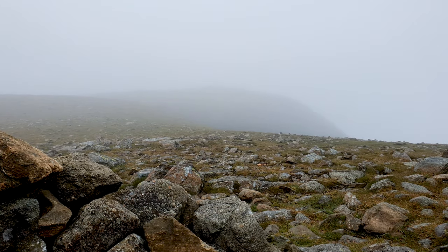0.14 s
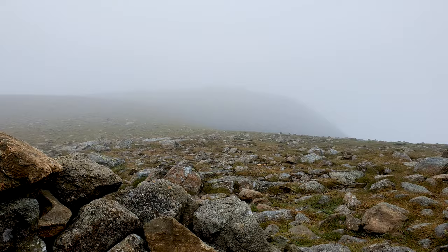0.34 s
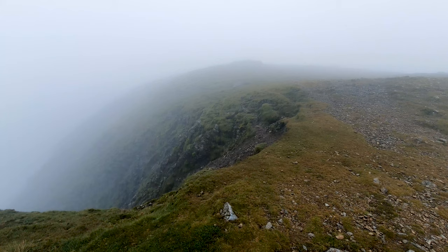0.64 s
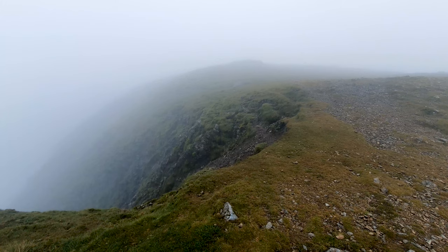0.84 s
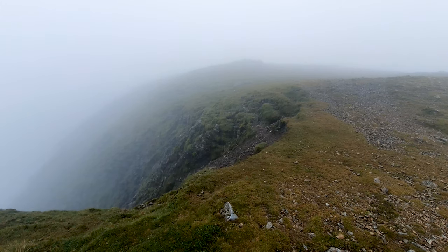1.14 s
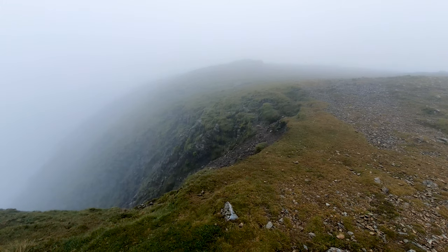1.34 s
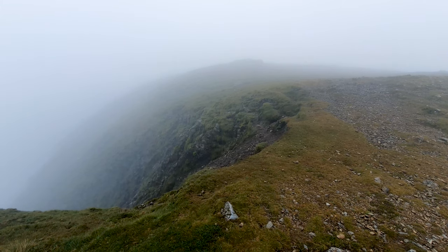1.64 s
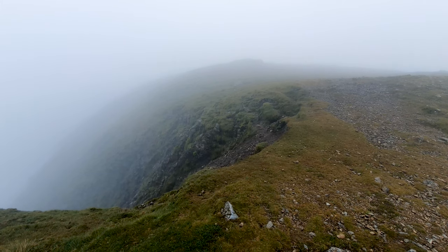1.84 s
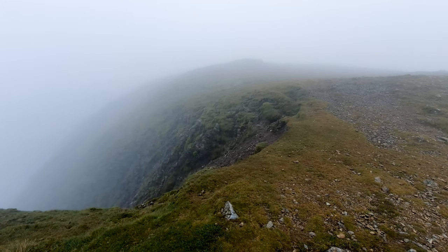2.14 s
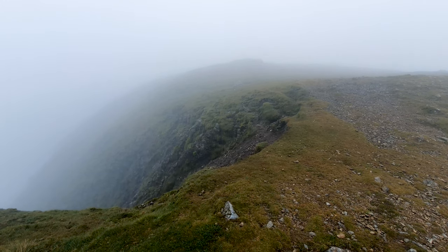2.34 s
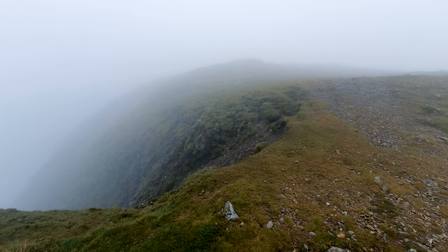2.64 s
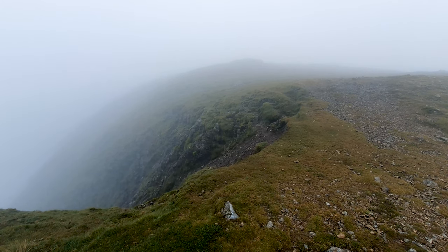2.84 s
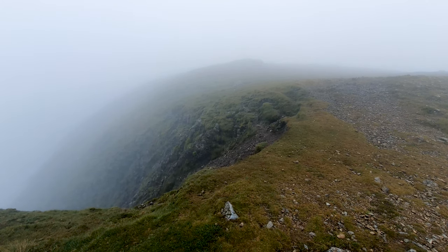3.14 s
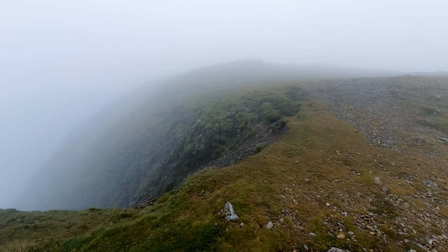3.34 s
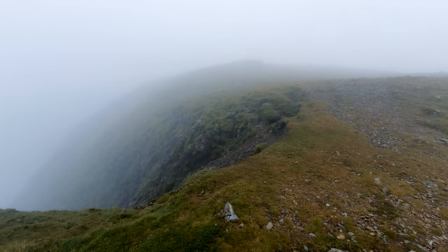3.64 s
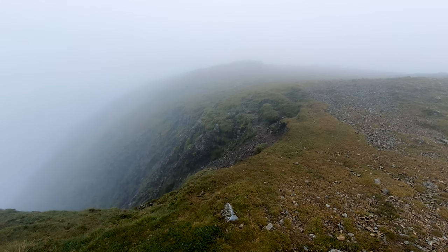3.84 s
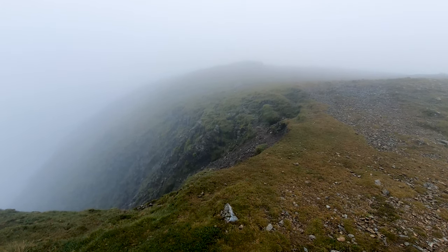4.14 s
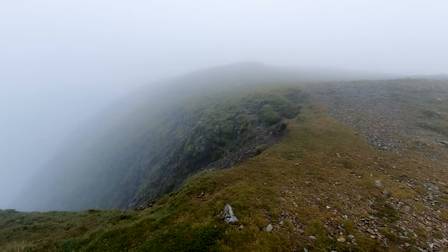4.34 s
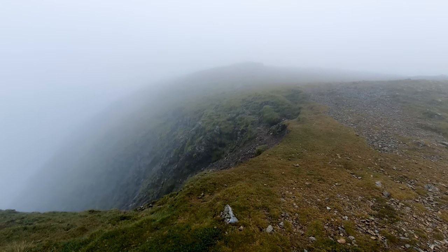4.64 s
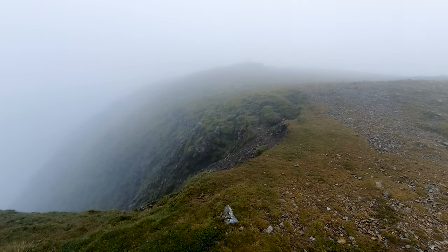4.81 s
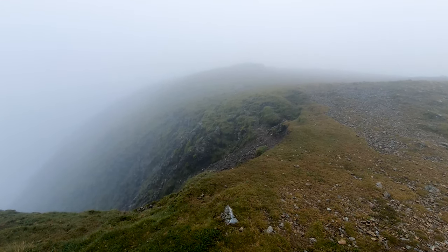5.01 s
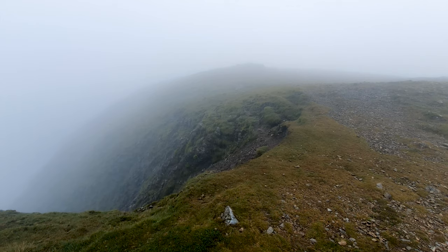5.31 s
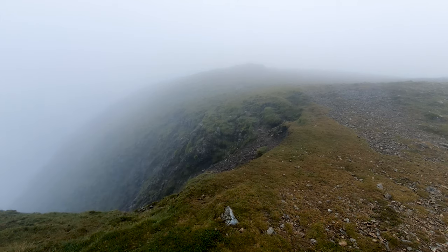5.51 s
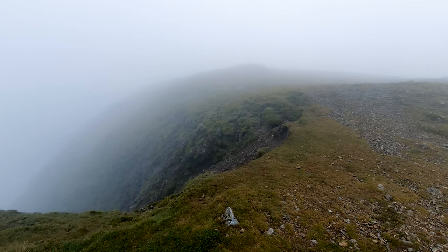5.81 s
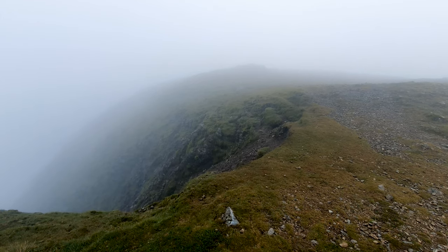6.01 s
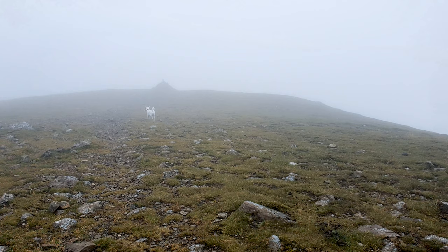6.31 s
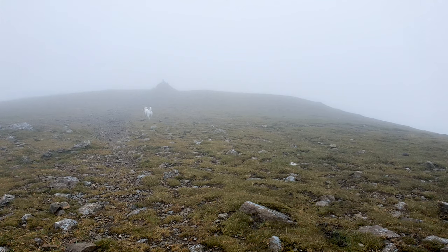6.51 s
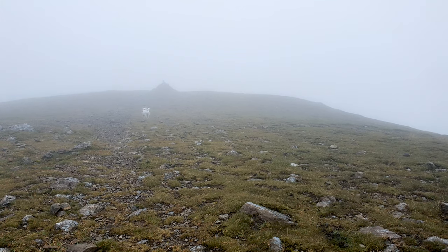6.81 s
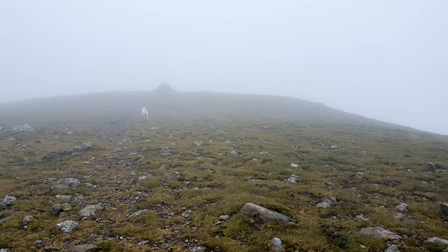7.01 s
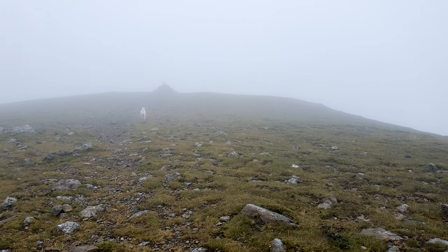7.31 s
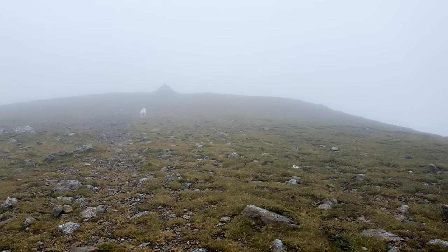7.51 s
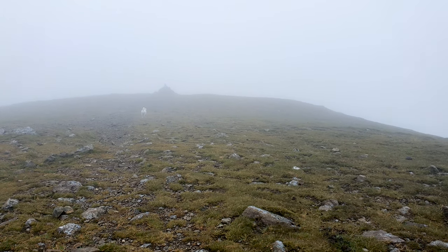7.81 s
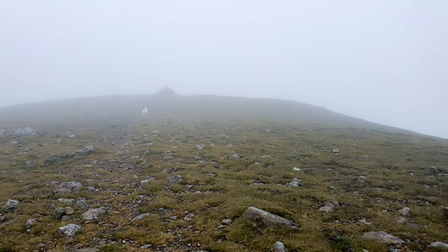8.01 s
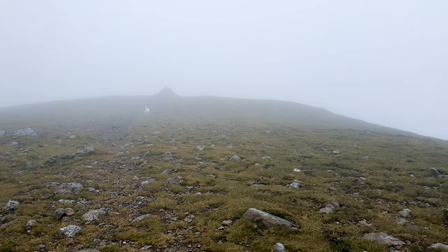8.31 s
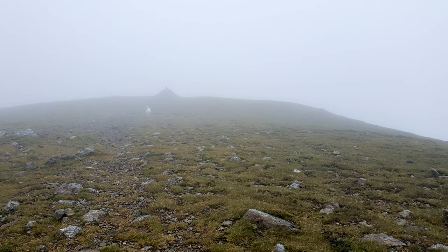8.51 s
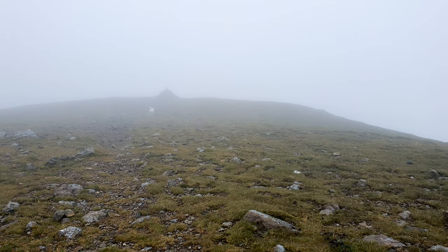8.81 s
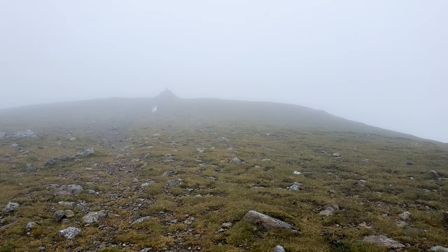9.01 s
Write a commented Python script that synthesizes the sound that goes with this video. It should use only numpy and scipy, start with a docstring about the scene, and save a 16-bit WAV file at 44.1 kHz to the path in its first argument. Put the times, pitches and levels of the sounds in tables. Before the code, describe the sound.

Uneven gusts of wind beat on a bare microphone outdoors, making a lumpy low rumble, a roar and short hissing puffs.

```python
"""A low rumble and a hiss, soon swelling into thumps: strong wind beats on a bare microphone.
It blows at three spots on a foggy mountain top: behind rocks, on a ridge, then on an open slope.
Big swirls of air shake the microphone's diaphragm, the thin skin that picks up sound (a lumpy rumble).
Small swirls rush past its opening (a roar, and a hiss that brightens with each gust)."""
import sys
import numpy as np
from scipy import signal
from scipy.fft import rfft, irfft
from scipy.io import wavfile
from scipy.ndimage import uniform_filter1d

SR = 44100
rng = np.random.default_rng(int(sys.argv[2]) if len(sys.argv) > 2 else 0)


def bounce(signal):
    """Save signal as a 16-bit WAV file at the path given by the first command-line argument."""
    frames = np.transpose(np.atleast_2d(signal))
    limited = np.clip(frames, -1, 1)
    pcm = np.round(limited * 32767).astype(np.int16)
    wavfile.write(sys.argv[1], SR, pcm)


N = 403515


def from_db(db):
    return 10 ** (np.asarray(db) / 20)


def rms_one(x):
    return x / np.sqrt(np.mean(x ** 2) + 1e-20)


def in_time(rows, column=1):
    rows = np.array(rows)
    return np.interp(np.arange(N) / SR, rows[:, 0], rows[:, column])


def at_hz(rows, hz):
    rows = np.array(rows)
    return np.interp(np.log(hz), np.log(rows[:, 0]), rows[:, 1])


def band_db(colour, low, high):
    """Level of a tone colour between two frequencies."""
    hz = np.arange(low, high, 5.)
    return 10 * np.log10(np.sum(from_db(2 * at_hz(colour, hz))))


def drift(rate_hz):
    """A smooth random wobble, about 1 in size."""
    pole = np.exp(-80 * np.pi * rate_hz / SR)
    slow = signal.lfilter([1], [1, -2 * pole, pole * pole], rng.standard_normal(N // 40 + 2002))[2000:]
    return np.interp(np.arange(N) / 40, np.arange(len(slow)), rms_one(slow))


def flicker(rate_hz, trend_s):
    """A random wobble with its slow trend taken out."""
    wobble = drift(rate_hz)
    return rms_one(wobble - uniform_filter1d(wobble, int(trend_s * SR)))


def humps(middles, lengths, heights, rise=1.):
    """Bell-shaped bumps in time; a rise below 1 makes their fronts steeper."""
    t = np.arange(0, N, 40) / SR
    x = 2 * (t - np.reshape(middles, (-1, 1))) / np.reshape(lengths, (-1, 1))
    bells = np.exp(-np.where(x < 0, x / rise, x) ** 2)
    return np.interp(np.arange(N) / SR, t, np.asarray(heights) @ bells)


def microphone_hiss(level_db):
    """The microphone's own faint, steady hiss."""
    return from_db(level_db) * rng.standard_normal(N)


# moves to the next spot: (t/s, fade/s)
MOVES = [(.66, 0.047), (6.382, 0.024)]


def spots():
    """How much of each spot (rocks, ridge, slope) is heard at each moment."""
    t = np.arange(N) / SR
    to_ridge, to_slope = [np.clip((t - when) / fade + .5, 0, 1) for when, fade in MOVES]
    return np.array([1 - to_ridge, to_ridge - to_slope, to_slope])


# gusts at the opening: (t/s, level/dB)
GUSTS = [(0, -48.5), (.25, -48), (.29, -44.5), (.5, -44), (.66, -45.5), (.76, -36.5), (1.05, -36),
         (1.25, -42), (1.55, -42), (1.8, -47), (1.96, -54.5), (1.99, -44.5), (2.14, -36), (2.4, -33),
         (2.6, -37.5), (3.1, -38.5), (3.4, -33), (3.69, -34.5), (3.73, -43), (4.0, -39.5), (4.25, -45),
         (4.72, -37), (5.05, -35.5), (5.15, -41), (5.9, -45), (6.29, -37.5), (6.5, -43.5), (6.9, -40),
         (7.2, -39), (7.65, -47), (8.5, -46), (8.92, -43), (8.96, -38.5), (9.15, -40)]
# the air stalls for a moment: (t/s, dip/dB, length/s)
LULLS = [(0.59, 1.5, .05), (0.916, 6, 0.12), (1.142, 10, 0.12), (1.657, 1, 0.13), (2.83, 2.5, 0.036),
         (3.206, 8, 0.068), (3.323, 4, 0.044), (3.458, 3, 0.059), (4.059, 9, 0.057), (4.19, 4.5, 0.056),
         (4.454, 6, .07), (4.67, 3, 0.041), (4.786, 4, 0.054), (4.932, 5.5, 0.04), (5.562, 6, 0.03),
         (6.555, 2.5, .06), (6.694, 4, 0.044), (7.67, 2, .06), (8.246, 2.5, .05), (8.355, 3, 0.044),
         (8.632, 8, 0.12), (8.724, 3.5, .05)]
# short puffs across the opening: (t/s, peak level/dB, length/s)
PUFFS = [(0.69, -28, 0.035), (0.94, -19.5, 0.045), (1.197, -42, 0.025), (1.432, -23.5, 0.03),
         (1.533, -26, 0.05), (1.726, -29.5, 0.051), (1.982, -24, 0.013), (2.68, -19.5, 0.065),
         (2.928, -18.5, 0.055), (3.23, -24, 0.057), (3.815, -21.5, 0.045), (4.086, -24.5, 0.056),
         (5.38, -30, 0.073), (5.607, -26.5, 0.056), (5.705, -24, 0.045), (5.922, -24, 0.05),
         (6.257, -23.5, 0.045), (6.397, -24, 0.027), (6.585, -21, 0.083), (6.657, -22, 0.029),
         (6.82, -29, .03), (6.89, -20, .04), (6.99, -24, .04), (7.13, -26.5, 0.081), (7.308, -29, 0.022),
         (7.775, -25, 0.017), (7.903, -23.5, 0.017), (8.094, -31, 0.028), (8.203, -23.5, 0.02),
         (8.289, -23, 0.022), (8.395, -30, 0.012), (8.764, -25.5, 0.021)]


def gust_db(flutter_db, sway_db, crest_db, puff_rise):
    """The wind's changing strength: gusts, lulls and puffs, with random sway and flutter."""
    t, dip_db, length = np.transpose(LULLS)
    level = in_time(GUSTS) - humps(t, length, dip_db)
    level += sway_db * flicker(12.2, trend_s=0.14) + flutter_db * flicker(76, trend_s=0.041)
    t, peak_db, length = np.transpose(PUFFS)
    power = from_db(2 * (peak_db - crest_db))   # noise averages crest_db below its peaks
    puffs = humps(t + puff_rise * length / 2, length, power, puff_rise)
    return 10 * np.log10(from_db(2 * level) + puffs)


RUMBLE, ROAR, MIDS, TREBLE = range(4)
# each spot in a -40 dB gust: (rumble level/dB, roar level/dB, mids boost/dB, treble boost/dB)
SPOT_LEVELS = [(-30.5, -34, -0.5, 3), (-21, -27, -0.2, -1.7), (-19.5, -30.5, 1, 1.5)]
# growth for each dB of gust: (rumble/dB, roar/dB, mids/dB, treble/dB)
GROWTH = (0.41, 0.73, 0.072, 0.6)


def follow_gust(gust, part, lag_s=0.026):
    """One part's level in dB, smoothed because bigger swirls answer a gust more slowly."""
    excess_db = uniform_filter1d(gust, int(lag_s * SR)) + 40
    return np.array(SPOT_LEVELS)[:, part] @ spots() + GROWTH[part] * excess_db


# the wind's tone colour at each spot: (f/Hz, relative level/dB)
ROCKS = [(110, 2), (200, -1), (420, -10), (850, -11.5), (1150, -17.5), (1350, -23.2), (1950, -27),
         (2650, -26), (3300, -34), (4600, -35.5), (7000, -46), (10000, -53.5), (15500, -67.3)]
RIDGE = [(110, -4), (150, -7), (300, -12.5), (600, -16), (1150, -20), (1600, -27), (3000, -32.5),
         (4300, -37), (6000, -44.5), (7000, -47), (8200, -51), (10200, -58), (12300, -55), (15500, -71.6)]
SLOPE = [(110, -13), (160, -5.5), (260, -12), (500, -20.5), (900, -26), (1800, -30), (3300, -33.5),
         (3800, -40.5), (4500, -49), (5500, -49.5), (6500, -59.5), (9500, -61.5), (12000, -71.4),
         (15500, -90)]
# how gusts brighten the hiss: (f/Hz, boost/dB for each dB of gust)
BRIGHTENING = [(500, -0.28), (1000, -0.25), (2500, 0.03), (5000, 0.24), (12000, -0.51)]
# slow changes of tone: (t/s, roar boost/dB, mids boost/dB, treble boost/dB)
TONE_CHANGES = [(0, -2, 0.54, 0), (.9, 1.5, 0.094, 2), (1.5, 0.6, 0.19, 1), (2.2, 1.7, -0.16, .3),
                (3.0, 0, 0.071, 0.5), (4.0, -0.4, 0, -.3), (4.8, -0.5, -0.36, 0.5), (5.6, 1.5, -0.59, 1),
                (6.2, -1.2, 1.1, -.6), (6.5, -0.5, 0, 2), (7.0, -0.2, -0.11, 2.5), (7.7, -1, 0.23, -2.5),
                (8.6, 0, 0.39, 0), (9.15, 0, 0, .6)]


def rush(gust, patchy_db, patch_hz, roar_sway_db, roar_top_hz=243, hiss_bottom_hz=900):
    """Small swirls rush past the opening: narrow bands of noise, a roar below and a hiss above."""
    places = list(zip(spots(), (ROCKS, RIDGE, SLOPE)))
    roar, mids, treble = [follow_gust(gust, part) + in_time(TONE_CHANGES, part)
                          for part in (ROAR, MIDS, TREBLE)]
    roar += roar_sway_db * flicker(11.0, trend_s=0.23)
    usual_gust = sum(here * np.average(gust, weights=here) for here, _ in places)
    soften = signal.butter(2, 3000, fs=SR, output="sos")   # each high band leans to its low side
    noise = signal.sosfilt(soften, rng.standard_normal((2, N)))
    edges = 125 * 2 ** np.arange(0, 7.2, 1 / 4)   # Hz, a quarter octave apart
    patches = drift(patch_hz)
    out = np.zeros(N)
    for k, (low, high) in enumerate(zip(edges, edges[1:])):
        hz = np.sqrt(low * high)
        band_pass = signal.butter(3, [low, high], "band", fs=SR, output="sos")
        band = rms_one(signal.sosfilt(band_pass, noise[k % 2]))
        colour = sum(here * band_db(tone, low, high) for here, tone in places)
        roar_db = roar + colour - sum(here * band_db(tone, 150, 500) for here, tone in places)
        hiss_db = gust + colour - sum(here * band_db(tone, 1500, 7000) for here, tone in places)
        hiss_db += at_hz(BRIGHTENING, hz) * (gust - usual_gust)
        hiss_share = np.clip(np.log(hz / roar_top_hz) / np.log(hiss_bottom_hz / roar_top_hz), 0, 1)
        level = (1 - hiss_share) * roar_db + hiss_share * hiss_db
        level += mids * np.exp(-np.log2(hz / 800) ** 2)   # around 800 Hz
        level += treble * np.clip(np.log2(hz / 6000), 0, 1)   # above 6000 Hz
        patches = 0.92 * patches + 0.63 * drift(patch_hz)   # loud patches spill into the next band
        out += band * from_db(level + patchy_db * patches)
    return out


# the rumble's tone colour: (f/Hz, relative level/dB)
RUMBLE_COLOUR = [(13, -39), (22, -34), (43, 1.5), (65, 4.5), (84, 1), (170, -17.5), (220, -58), (370, -120)]
# the deepest bass against the rest of the rumble: (t/s, boost/dB)
DEEP_BASS = [(0, -9), (.9, -2), (1.8, 8.5), (2.5, -6.5), (5.0, -4.5), (5.7, 1.5), (7.2, -2), (9.15, 5.5)]
# big swirls thump the diaphragm: (t/s, length/s, level/dB)
THUMPS = [(0.53, 0.022, -25), (0.706, 0.014, -22), (0.817, 0.11, -16), (0.951, 0.0097, -4.5),
          (1.037, 0.025, -15.0), (1.25, 0.069, -19), (1.358, 0.017, -5), (1.493, 0.038, -18),
          (1.604, 0.023, -30), (1.756, 0.03, -22), (1.965, 0.016, -13), (2.063, 0.047, -14.5),
          (2.12, 0.034, -18), (2.228, 0.018, -11.5), (2.293, 0.037, -10), (2.36, 0.026, -11),
          (2.476, 0.024, -11), (2.523, 0.02, -7), (2.719, 0.03, -9.5), (2.891, 0.019, -11),
          (2.949, 0.029, -8), (3.097, 0.018, -15.0), (3.175, 0.025, -14.0), (3.287, 0.052, -13.5),
          (3.413, 0.044, -12), (3.506, 0.094, -13.5), (3.816, 0.022, -15), (3.871, 0.023, -20),
          (4.56, 0.058, -16), (4.763, 0.024, -18), (4.832, 0.023, -13), (4.998, 0.048, -16),
          (5.106, 0.034, -17.0), (5.233, 0.05, -15.5), (5.42, 0.027, -17.0), (5.602, 0.055, -11),
          (5.72, 0.044, -17.5), (6.054, 0.024, -21), (6.148, 0.027, -15), (6.21, 0.025, -14.0),
          (6.306, 0.035, -13), (6.592, 0.056, -9.5), (6.76, 0.042, -13.5), (6.94, 0.18, -15),
          (7.236, 0.084, -16.5), (7.388, 0.031, -24), (7.537, 0.021, -17), (7.727, 0.03, -22),
          (8.04, 0.03, -17), (8.133, 0.029, -21.5), (8.216, 0.025, -18.0), (8.32, 0.038, -22),
          (8.413, 0.028, -21), (8.479, 0.015, -13), (8.768, 0.019, -22), (8.966, 0.025, -19),
          (9.026, 0.088, -16), (9.118, 0.045, -18.5)]
# the rumble drops out between swirls: (t/s, dip/dB); a negative dip lifts it
GAPS = [(1.01, 17), (1.082, 10), (1.898, 13), (2.836, 13), (2.929, 13), (3.245, 4), (3.722, -2), (4.791, 6),
        (4.941, 13), (5.581, 14), (5.763, 18), (6.473, 8), (7.176, 14), (8.189, 19), (8.626, 10),
        (8.886, 11)]


def rumble(gust, evenness, even_s, lumpy_db, wander_db, deep_hz=57.6, gap_s=0.032):
    """Big swirls shake the diaphragm: low noise that swells, thumps and drops out."""
    hz = np.maximum(np.arange(N // 2 + 1) * SR / N, 1)
    band_pass = 1 / (1 + (hz / 190) ** 12) / (1 + (20 / hz) ** 8)   # 20 to 190 Hz
    spectrum = rfft(rng.standard_normal(N)) * from_db(at_hz(RUMBLE_COLOUR, hz)) * band_pass
    deep_share = 1 / (1 + (hz / deep_hz) ** 8)
    deep_gain = from_db(in_time(DEEP_BASS) + wander_db * drift(1.4))
    noise = rms_one(irfft(spectrum * (1 - deep_share), N) + deep_gain * irfft(spectrum * deep_share, N))
    # partly even out the noise's own swells so that the thumps stand out
    width = int(even_s * SR)
    swell = uniform_filter1d(uniform_filter1d(noise ** 2, width), width)
    steady = rms_one(noise / (swell + .05) ** (evenness / 2))
    power = from_db(2 * (follow_gust(gust, RUMBLE) + lumpy_db * flicker(18.4, trend_s=0.094)))
    t, length, level_db = np.transpose(THUMPS)
    power += humps(t, length, from_db(2 * level_db))
    t, dip_db = np.transpose(GAPS)
    power *= from_db(-2 * humps(t, gap_s, dip_db))
    return np.sqrt(power) * steady


def scene():
    """The same gusts drive the rumble and the rush, over the microphone's own hiss."""
    gust = gust_db(flutter_db=0.78, sway_db=0.76, crest_db=16.5, puff_rise=0.63)
    wind = rumble(gust, evenness=0.85, even_s=0.021, lumpy_db=1.5, wander_db=1.1)
    wind += rush(gust, patchy_db=0.56, patch_hz=13.5, roar_sway_db=0.72)
    return (wind + microphone_hiss(level_db=-83))[None]


def record(dry):
    """Thin the bass below 35 Hz, round off loud peaks and cut the treble above 15600 Hz."""
    thinned = signal.sosfilt(signal.butter(4, 35, "high", fs=SR, output="sos"), dry)
    rounded = 1.21 * np.tanh(thinned / 1.208)
    return signal.sosfilt(signal.ellip(10, .5, 70, 15600, fs=SR, output="sos"), rounded)


dry = scene()
out = record(dry)
bounce(out)
```